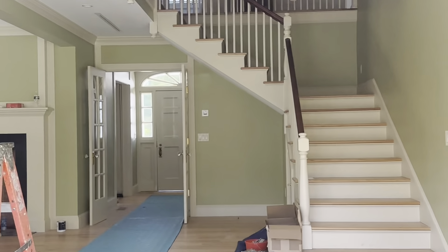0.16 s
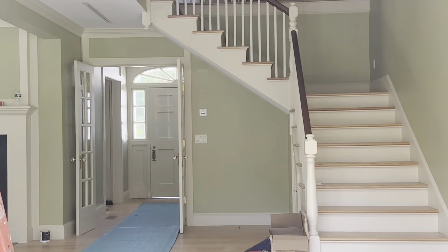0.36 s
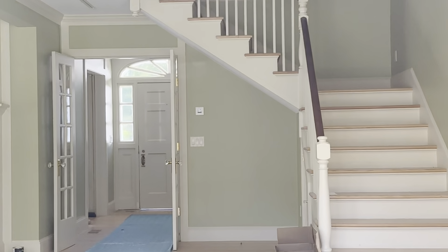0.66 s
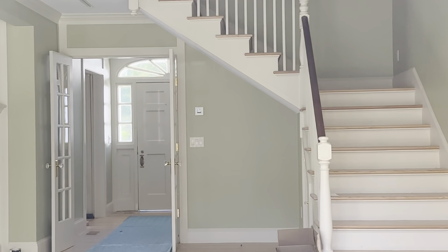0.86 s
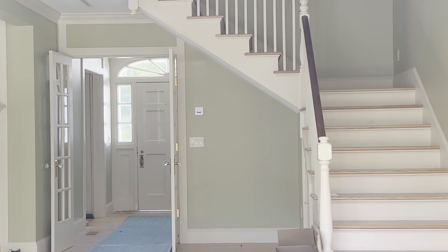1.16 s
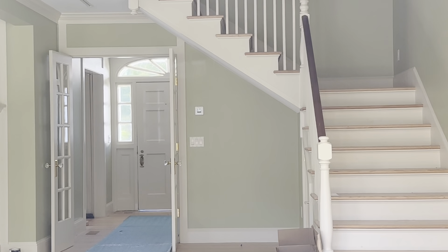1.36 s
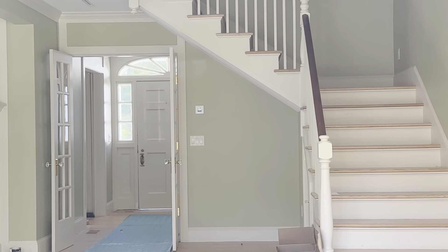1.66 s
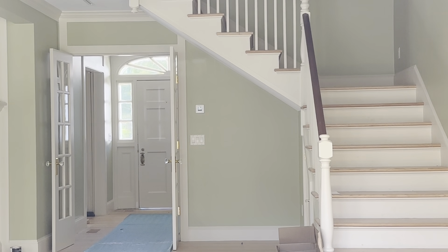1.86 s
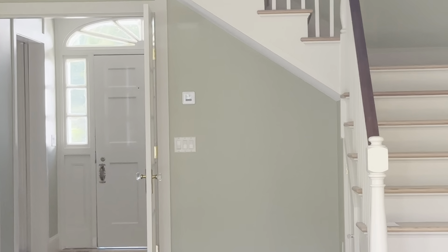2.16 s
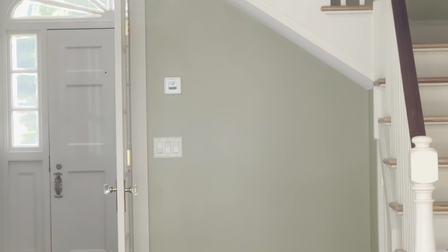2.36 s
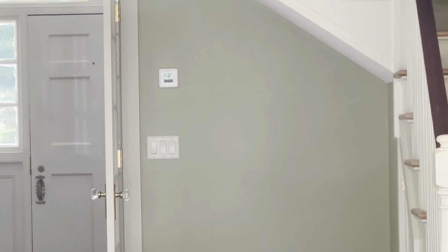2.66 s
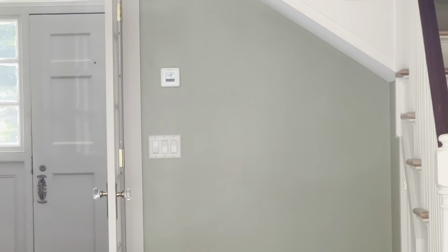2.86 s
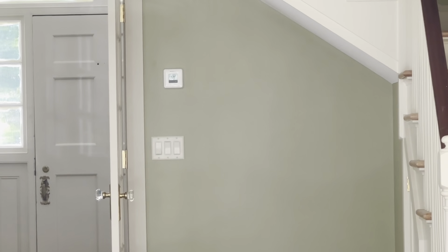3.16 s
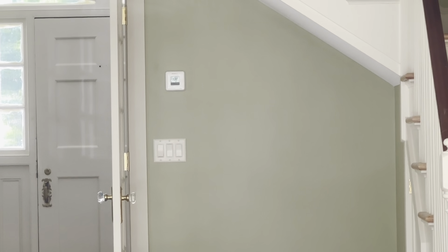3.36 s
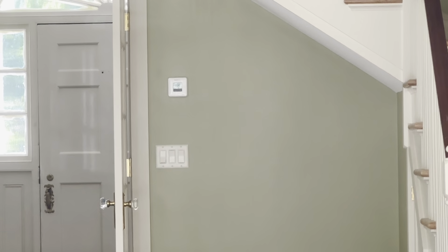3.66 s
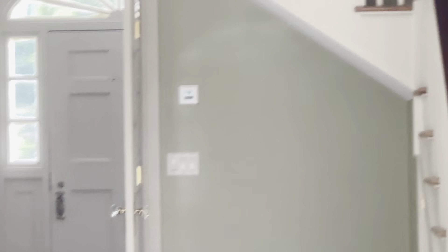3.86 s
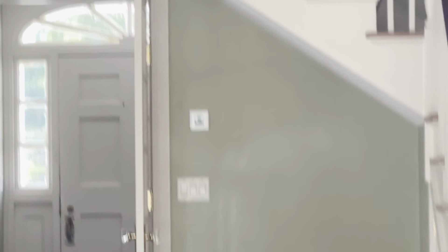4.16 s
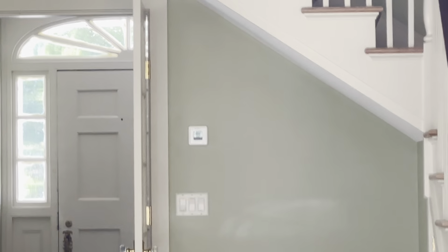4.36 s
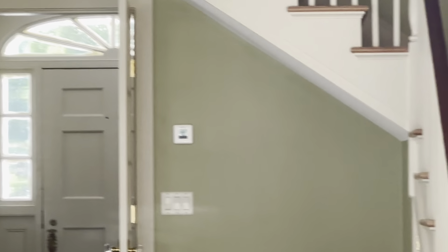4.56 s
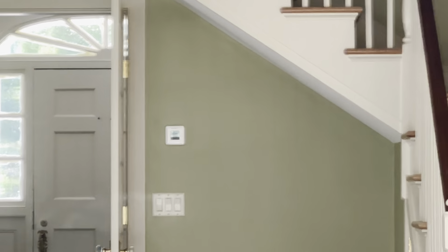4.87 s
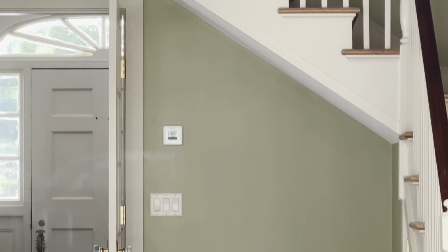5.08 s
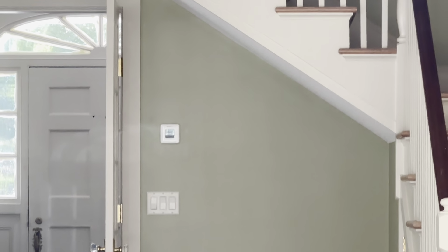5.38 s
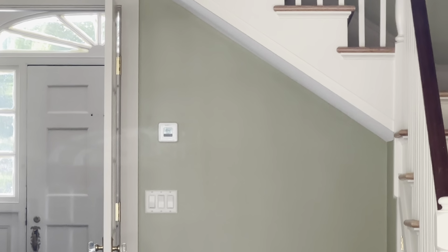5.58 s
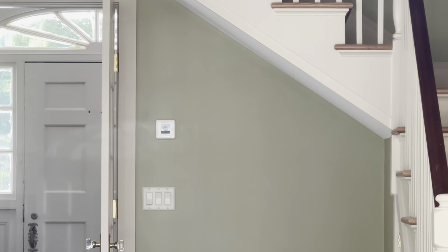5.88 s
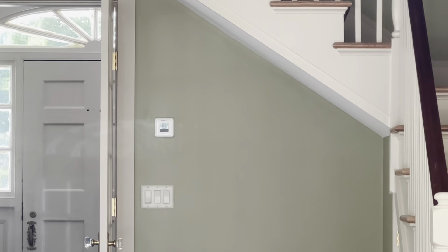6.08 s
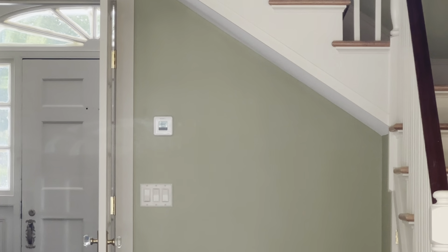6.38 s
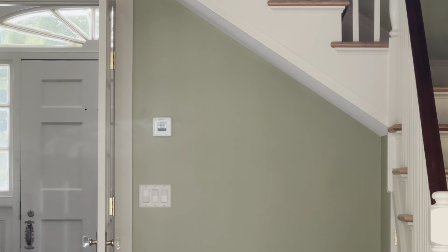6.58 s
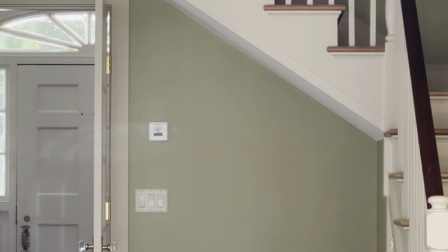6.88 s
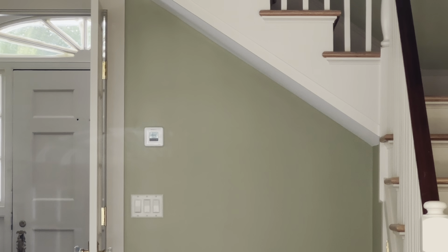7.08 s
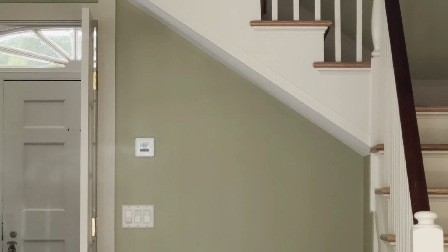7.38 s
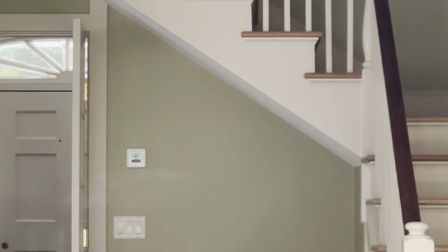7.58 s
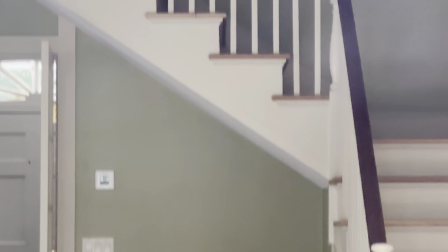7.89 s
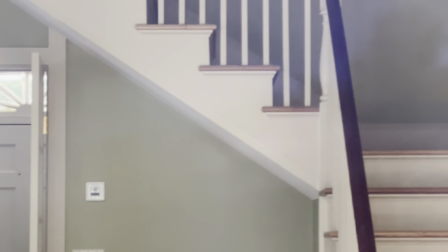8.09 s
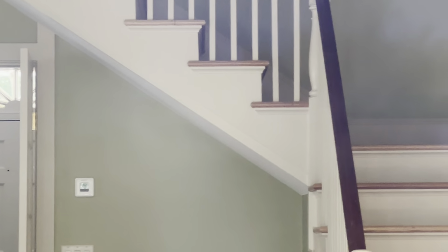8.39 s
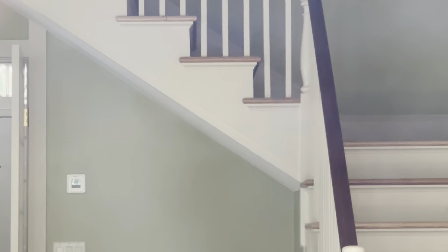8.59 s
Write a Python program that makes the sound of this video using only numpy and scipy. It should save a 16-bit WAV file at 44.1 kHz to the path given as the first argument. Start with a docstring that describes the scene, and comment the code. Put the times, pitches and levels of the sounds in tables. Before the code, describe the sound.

Two crickets hold a high, shimmering trill while another chirps in quick threes over distant insects and soft open air. Close by, a handheld phone lightly knocks a glass door pane, feet thump and scuff on boards, and the insects dull briefly. One sharp, loud knock jumps out midway, followed by small taps. Later come faint steps, and the insects fade behind the house.

```python
"""From the start two crickets trill, heard between about 5.2 and 5.7 kHz, and a third chirps in threes, each
wing stroke a drooping tone, over far insects, open air and handling rumble made of coloured noise.
From 1.8 s someone shifts about by a house: the phone knocks a glass door pane (dispersed sweeps, ringing modes),
footfalls are damped swings, scuffs and cloth shaped noise. The house screens the insects at about 3.6 to 5 s;
a sharp knock falls at 4.9 s, a faint resonance slides down near 6 s, and the screen returns from 7.5 s on."""
import sys
import numpy as np
from scipy import signal
from scipy.fft import rfft, irfft, next_fast_len
from scipy.io import wavfile

SR = 44100
rng = np.random.default_rng(int(sys.argv[2]) if len(sys.argv) > 2 else 0)


def file_out(sig):
    """Save sig as 16-bit WAV at sys.argv[1]."""
    # one column per channel
    cols = np.atleast_2d(sig).T
    # limit, then scale
    lim = np.clip(cols, -1, 1)
    pcm = np.round(lim * 32767).astype(np.int16)
    wavfile.write(sys.argv[1], SR, pcm)


N = 385434

# Knocks of the phone against a glass door pane: (time [s], peak level of the sweep [dB], lowest pitch [Hz],
# spectral fall [dB per octave], level of the ring re sweep [dB], node frequency [Hz])
KNOCK_EVENTS = [(1.833, -27.5, 62.5, 3, -18, 1070), (1.8450, -35.5, 126, 7, -24, 1700),
                (1.9323, -32.5, 100, 5, -14, 1390), (3.1838, -36.5, 112, 11, -17, 2600),
                (4.8804, -3.2, 116, 8.8, -17, 670), (4.925, -47, 500, 3, -15, 800),
                (5.0458, -28, 700, 0.5, -20.5, 754), (5.226, -45, 328, 7, -6, 900),
                (5.7635, -32, 90, 2.5, -22, 2170)]
# Footfalls, shifts of weight, and the low thump under the sharp knock:
# (time [s], peak level [dB], pitch [Hz])
THUMP_EVENTS = [(1.853, -29, 65), (2.403, -32, 62.5), (2.440, -38.5, 110), (2.467, -39.5, 72.5),
                (2.617, -43.5, 115), (2.946, -41, 98), (3.051, -42, 79), (3.188, -33.5, 138),
                (3.232, -39, 69.6), (3.35, -42.5, 351), (3.707, -44, 95), (4.882, -24.5, 58),
                (5.784, -33, 57), (7.225, -42.5, 77.4), (7.43, -43, 105), (8.492, -49, 74),
                (8.638, -46.5, 89)]
# Scuffs of soles and sleeves: (middle [s], length [s], rasp level [dB], swish level [dB], rasp pitch [Hz])
SCUFF_EVENTS = [(3.205, 0.031, -45, -47.5, 2480), (3.249, 0.048, -42.5, -48, 2570),
                (3.374, .085, -50, -52.5, 2380), (3.492, 0.039, -68, -49.5, 2680),
                (3.665, 0.089, -55, -51.5, 2780), (3.724, 0.065, -55.5, -48.5, 6030),
                (3.866, .06, -85, -59, 2500), (4.19, 0.18, -59, -59.5, 2350),
                (4.681, 0.43, -56.5, -59, 2503), (5.075, 0.013, -59, -48.5, 2505),
                (5.127, 0.022, -55.5, -53.5, 3385), (7.241, 0.034, -47.5, -48, 2980),
                (7.442, 0.041, -54.5, -51.5, 1530), (7.519, 0.11, -61, -58, 6500),
                (7.594, 0.076, -51, -62, 2600)]
# Modes of the glass pane: (frequency [Hz], relative level [dB], decay time by 60 dB [s])
PANE_MODES = [(110.7, -1.5, .1), (161.3, 5.5, 0.2), (216, -5.5, 0.203), (240, -13.5, 0.057), (269, -3, .16),
              (302, -8.5, .12), (338, 2, 0.17), (380.4, -3.5, 0.151), (415.5, -7, .15), (490, -12, 0.15),
              (545, -23.5, 0.2), (727, -20.5, 0.141), (826, -24.5, .15), (1220, -16.5, .06)]
# First pulse of each three-pulse chirp: time [s]
CHIRP_TIMES = [0.195, 1.062, 1.933, 2.309, 2.842, 3.326, 3.834, 4.190, 4.572, 5.002, 5.397, 5.815, 6.216,
               6.572, 6.982, 7.349, 7.702, 8.143, 8.530]
# Relative noise spectra: (frequency [Hz], level [dB per Hz])
RUMBLE_SPECTRUM = [(20, -15.5), (35, -4.5), (50, 1), (90, 0.5), (140, -14.5), (250, -20.5), (600, -42.5)]
AIR_SPECTRUM = [(60, 1), (150, 4), (300, 0), (600, -2.5), (1000, -4), (1600, -5), (2600, -10),
                (4000, -33.5)]
LOW_CHORUS_SPECTRUM = [(1400, -20), (1750, -10), (1950, -0.5), (2250, -2), (2550, -8), (3000, -33.5)]
HIGH_CHORUS_SPECTRUM = [(2200, -22), (2600, -4), (2920, 4.5), (3200, -2.5), (3600, -4), (4300, -26.5),
                        (5500, -36)]
HISS_SPECTRUM = [(2800, -24), (3800, 1.5), (4650, 7), (6200, 3), (7400, 3.5), (8500, 6.5), (9200, -3.5),
                 (10500, -5.5), (11500, -22), (16000, -20)]
RASP_SPECTRUM = [(200, -11), (400, -15.5), (800, -28.5), (1600, -9.5), (2100, 2.5), (2600, 3), (3500, -11),
                 (6000, -13), (10000, -24), (12500, -49)]
SWISH_SPECTRUM = [(80, 11), (350, 10.5), (800, 0.5), (1600, 0.5), (3000, 1), (4500, 1.5), (6500, 0.5),
                  (8500, -3), (10300, 1.5), (11700, -17.5), (16000, -16)]
CLOTH_SPECTRUM = [(6000, -12), (10000, -2.5), (16000, 0.5)]
# Stereo width of the noises: (frequency [Hz], side gain re mid [dB])
STEREO_WIDTH = [(30, -20), (90, -30.5), (200, -16.5), (380, -9.5), (700, -5.5), (1290, -4.5), (2000, -36),
                (3300, -73), (4500, -24.5), (6000, -25.5), (8100, -16.5)]
# Screening of the insects by the house: (time [s], loss [dB])
SCREEN_LOSS = [(3.55, -1), (3.9, 9.5), (4.3, 10), (4.7, 7.5), (5.0, -0.5), (7.45, 0), (7.85, 19),
               (8.25, 26.5), (8.74, 27)]
# Insect voices by name: (level before the turn [dB], gain by the turn [dB], share of the screen loss [1])
INSECT_VOICES = {"upper trill": (-63, 5.5, 0.66), "lower trill": (-62.5, 4, 0.62),
                 "chirper": (-52, 4.1, 0.63), "low chorus": (-60.5, -2.5, .5),
                 "high chorus": (-58, -1.9, 1.0), "hiss": (-64, 1.6, 0.29)}
# Low handling rumble of microphone and boards: (start [s], end [s], level added to the calm [dB])
RUMBLE_SPELLS = [(.1, 2.45, -62.5), (2.39, 3.4, -54), (3.677, 3.94, -58.5), (4.847, 5.3, -56),
                 (6.67, 7.4, -61.5), (8.35, 8.6, -65.5)]
# Open air: (time [s], level [dB])
AIR_LEVEL_CURVE = [(0.3, -64), (.9, -59.5), (3.3, -59), (4.4, -61.5), (5.15, -58), (5.9, -65), (6.7, -65),
                   (7.45, -57.5), (7.8, -64.5)]
# Upper trill, strongest frequency as heard, shifted by reflections near the microphone:
# (time [s], frequency [Hz])
UPPER_PEAK_CURVE = [(.55, 5670), (.8, 5480), (2.8, 5520), (3.15, 5700), (4.0, 5680), (4.9, 5664),
                    (7.65, 5675), (8.2, 5450)]
# Phase lead of the left microphone port over the right: (frequency [Hz], phase [rad])
PORT_PHASE_LEAD = [(4200, 0), (4600, -.3), (4820, -1), (4945, -3.1), (5080, -5.1), (5400, -6.28),
                   (6500, -6.3), (9470, -7.9), (11200, -9.4), (16000, -10)]
# Clothes brushing as the walker moves: (start [s], end [s], level [dB])
BRUSHING_SPELLS = [(3.98, 4.85, -75.5), (5.0, 5.42, -78), (6.78, 7.6, -84.5)]
# Faint falling resonance, from reflections that colour the insect sound as the microphone moves:
# (middle [s], length [s], level [dB], frequency at the middle [Hz], fall [Hz per s])
RESONANCE_GLIDE = (6, 1, -72, 3102.5, 3600)

CUTOFF_HZ = 16800
RASP_HZ = 2400   # rasp pitch at which its spectrum is left unshifted
THUMP_T60_S = 0.12
TURN_S, TURN_LENGTH_S = 4.3, 0.6   # the microphone turns from the chorus towards the crickets
CALM_DB, RUMBLE_EDGE_S = -67.5, 0.08


def from_db(db):
    """Amplitude ratio: 20 dB is a factor of ten."""
    return np.exp(np.asarray(db) * (np.log(10) / 20))


def rms_one(x):
    """Normalisation to unit mean power."""
    return x / np.sqrt(np.mean(x ** 2) + 1e-20)


def seconds():
    """Sampling: time of every sample."""
    return np.arange(N) / SR


def curve(rows):
    """Linear interpolation of a curve at every sample."""
    return np.interp(seconds(), *np.transpose(rows))


def rise(s, length):
    """Smooth step: a hyperbolic tangent from 0 to 1 around time s."""
    return 0.5 + 0.5 * np.tanh(np.clip(2 * (seconds() - s) / length, -10, 10))


def spells(rows, edge_s):
    """Superposition of smooth-edged spells of gain."""
    return sum(from_db(db) * rise(start, edge_s) * (1 - rise(end, edge_s)) for start, end, db in rows)


def at_hz(points, hz, **ends):
    """Interpolation of a spectrum on a logarithmic frequency axis."""
    points = np.array(points)
    return np.interp(np.log(hz + 1e-9), np.log(points[:, 0]), points[:, 1], **ends)


def drift(rate, size=N):
    """Slow random fluctuation: unit-spread normal knots, rate per second, joined by lines."""
    knots = rng.standard_normal(16384)
    return np.interp(np.arange(size) * (rate / SR), np.arange(len(knots)), knots)


def noise(spectrum, flicker_db, shift=1, size=N):
    """Spectral shaping of white noise, in stereo, raised in pitch by shift; flickering, rms 1."""
    hz = np.fft.rfftfreq(size, 1 / SR)
    colour = from_db(at_hz(spectrum, hz / shift, left=-87, right=-75.0))
    mid, side = rfft(rng.standard_normal((2, size))) * colour
    pair = mid + from_db(at_hz(STEREO_WIDTH, hz)) * side * [[1], [-1]]
    flicker = from_db(flicker_db * drift(25, size=size))
    return rms_one(irfft(pair, size) * flicker)


def add(out, s, sound):
    """Superposition: a sound is mixed in from time s on."""
    start = max(round(s * SR), 0)
    out[..., start:start + sound.shape[-1]] += sound[..., :max(N - start, 0)]


def heard(voice):
    """Screening and directivity: only the walls and the turn change the gain of an insect voice."""
    db, turn_db, share = INSECT_VOICES[voice]
    turned_db = turn_db * rise(TURN_S, TURN_LENGTH_S)
    return from_db(db + turned_db - share * curve(SCREEN_LOSS))


def handling_rumble():
    """Structure-borne noise: low rumble of microphone and boards swells in spells above a calm level."""
    strength = from_db(CALM_DB) + spells(RUMBLE_SPELLS, RUMBLE_EDGE_S)
    return strength * noise(RUMBLE_SPECTRUM, flicker_db=3.0)


def open_air():
    """Incoherent background: broad noise follows a slow level curve."""
    return from_db(curve(AIR_LEVEL_CURVE)) * noise(AIR_SPECTRUM, flicker_db=0.6)


def insect_chorus():
    """Incoherent sum: far insects merge into two noise bands and a leafy hiss."""
    low = heard("low chorus") * noise(LOW_CHORUS_SPECTRUM, flicker_db=0.47)
    high = heard("high chorus") * noise(HIGH_CHORUS_SPECTRUM, flicker_db=0.73)
    return low + high + heard("hiss") * noise(HISS_SPECTRUM, flicker_db=1.0)


def wing_tone(stroke, pitch_hz, droop_hz, waver_hz):
    """Stridulation: the scraper slows along its toothed file (stroke 0 to 1), so the tone droops."""
    stroke = np.clip(stroke, 0, 1)
    droop = droop_hz * (0.5 ** 2 - stroke ** 2)   # zero at mid-stroke
    hz = pitch_hz + droop + waver_hz * drift(300)
    return np.sin(np.pi * stroke) * np.sin(2 * np.pi * np.cumsum(hz) / SR)


def garden(x, scatter_db, t60, side_db=-9):
    """Diffuse scattering: leaves and walls give a call a short decaying tail."""
    age = np.arange(SR // 3) / SR
    tails = rng.standard_normal((2, len(age))) * from_db(-60 * age / t60)
    mid, side = (signal.fftconvolve(x, tail / np.linalg.norm(tail))[:N] for tail in tails)
    return x + from_db(scatter_db) * (mid + from_db(side_db) * side * np.array([[1], [-1]]))


def trill(rate_hz, pitch_hz, droop_hz, duty, scatter_db):
    """Periodic stridulation: an unbroken train of strokes, each filling the share duty of its beat; rms 1."""
    beats = np.cumsum(rate_hz * (1 + 0.003 * drift(5))) / SR
    tone = wing_tone(beats % 1 / duty, pitch_hz, droop_hz, waver_hz=60)
    song = tone * from_db(1.0 * drift(40))
    return rms_one(garden(song, scatter_db, t60=0.05))


def chirps(spacing_s=0.041, stroke_s=0.027, first_db=-3, count=3):
    """Grouped stridulation: three slow wing strokes in a row, the first one weaker."""
    stroke, level = np.zeros(N), np.zeros(N)
    ramp = np.linspace(0, 1, int(stroke_s * SR))
    for s in CHIRP_TIMES:
        for k in range(count):
            start = s + k * spacing_s - stroke_s / 2
            add(stroke, start, ramp)
            add(level, start, np.full(len(ramp), from_db(first_db * (k == 0))))
    song = level * wing_tone(stroke, pitch_hz=5030, droop_hz=620, waver_hz=70)
    return garden(song, scatter_db=-8, t60=0.07)


def crickets():
    """Beating: two trills of slightly different stroke rates drift in and out of step under the chirper."""
    high = trill(rate_hz=70.7, pitch_hz=curve(UPPER_PEAK_CURVE), droop_hz=380, duty=0.62, scatter_db=-9)
    low = trill(rate_hz=67.2, pitch_hz=5225, droop_hz=520, duty=0.64, scatter_db=-5)
    return heard("upper trill") * high + heard("lower trill") * low + heard("chirper") * chirps()


def pane_ring(age):
    """Modal resonance: modes build up once the waves return from the edges of the pane."""
    modes = 0
    for hz, db, t60 in PANE_MODES:
        modes = modes + from_db(db - 60 * age / t60) * np.sin(2 * np.pi * (hz * age + rng.random()))
    return modes * (1 - np.exp(-(age / 0.012) ** 2))


def knocks(spread_cycles=1.127, slowest_hz=110, contact_hz=3100, node_db=-12, node_octaves=0.6,
           side_db=-10, size=16384):
    """Dispersion: higher bending waves run faster, so a knock is a falling sweep; then the pane rings."""
    out, age = np.zeros((2, N)), np.arange(size) / SR
    hz = np.maximum(np.fft.rfftfreq(size, 1 / SR), 1)
    octaves = np.log2(hz / 500)
    # delay goes about as 1 / Hz
    travel = np.exp(-2j * np.pi * spread_cycles * np.log((hz + slowest_hz) / contact_hz))
    # the contact is soft: little but a faint tick lies above its corner
    contact = signal.freqs(*signal.butter(10, 1, analog=True), hz / contact_hz)[1]
    tick = from_db(-9.5) * hz / (hz + contact_hz) / (1 + (hz / 8000) ** 4)
    for s, db, low_hz, fall_db, ring_db, node_hz in KNOCK_EVENTS:
        # the size of the pane limits the longest wave
        span = signal.freqs(*signal.butter(5, 1, "high", analog=True), hz / low_hz)[1]
        # waves with a node at the struck spot stay weak
        node = node_db * np.exp(-(np.log2(hz / node_hz) / node_octaves) ** 2)
        spectrum = from_db(node - fall_db * octaves) * span * (contact + tick) * travel
        sweep = irfft(spectrum) * (age < age[-1] / 2)   # drop what wraps round in time
        ring = pane_ring(age) + from_db(side_db) * pane_ring(age) * [[1], [-1]]
        add(out, s, from_db(db) * (sweep / np.abs(sweep).max() + from_db(ring_db) * ring))
    return out


def footfalls_and_thump(press_s=0.0021, overtone_db=-17):
    """Damped oscillation: a loaded board swings a few times; the sharp knock's low thump has the same form."""
    out, age = np.zeros(N), np.arange(SR // 2) / SR
    swell = (1 - np.exp(-(age / press_s) ** 2)) * from_db(-60 * age / THUMP_T60_S)
    for s, db, hz in THUMP_EVENTS:
        overtone = from_db(overtone_db) * np.sin(2 * np.pi * 2.92 * hz * age)
        swing = np.sin(2 * np.pi * hz * age) + overtone
        add(out, s, -from_db(db) * swell / swell.max() * swing)
    return out


def scuffs(grain_db=2.5, size=32768):
    """Stick-slip friction: each stroke swells and fades with its own rasp, and tiny slips make it grainy."""
    out, from_middle = np.zeros((2, N)), (np.arange(size) - size / 2) / SR
    for s, length, rasp_db, swish_db, rasp_hz in SCUFF_EVENTS:
        stroke = 1 / np.sqrt(1 + (2 * from_middle / length) ** 6)
        rasp = from_db(rasp_db) * noise(RASP_SPECTRUM, flicker_db=1.5, shift=rasp_hz / RASP_HZ, size=size)
        swish = from_db(swish_db) * noise(SWISH_SPECTRUM, flicker_db=2.0, size=size)
        add(out, s + from_middle[0], stroke * (rasp + swish))
    return out * rms_one(from_db(grain_db * drift(450)))


def clothes():
    """Fibre friction: fabric gives a thin, flickering sizzle."""
    return spells(BRUSHING_SPELLS, edge_s=0.045) * noise(CLOTH_SPECTRUM, flicker_db=3.0)


def falling_resonance(waver_hz=90):
    """Moving interference: reflections colour the insects as the microphone moves, drawn as a gliding tone."""
    s, length, db, hz, fall_hz_per_s = RESONANCE_GLIDE
    from_middle = seconds() - s
    glide_hz = hz - fall_hz_per_s * np.clip(from_middle, -length, length) + waver_hz * drift(400)
    envelope = from_db(db) * np.exp(-(2 * from_middle / length) ** 2)
    return envelope * np.sin(2 * np.pi * np.cumsum(glide_hz) / SR)


def scene():
    """Linear superposition of the surroundings, the insects and the sounds close by."""
    surroundings = handling_rumble() + open_air() + insect_chorus()
    close_by = knocks() + footfalls_and_thump() + scuffs() + clothes()
    return surroundings + crickets() + close_by + falling_resonance()


def record(dry, bass_cut_hz=40):
    """Port phase and band limits: a small two-port microphone lacks deep bass; its left port lags in the treble."""
    bass_cut = signal.butter(3, bass_cut_hz, "high", fs=SR, output="sos")
    thinned = signal.sosfilt(bass_cut, dry)
    size = next_fast_len(N + SR)
    lag = np.exp(1j * at_hz(PORT_PHASE_LEAD, np.fft.rfftfreq(size, 1 / SR)))
    left = irfft(rfft(thinned[0], size) * lag, size)[:N]
    treble_cut = signal.cheby2(12, 70, CUTOFF_HZ, fs=SR, output="sos")
    return signal.sosfilt(treble_cut, np.array([left, thinned[1]]))


dry = scene()
out = record(dry)
file_out(out)
```